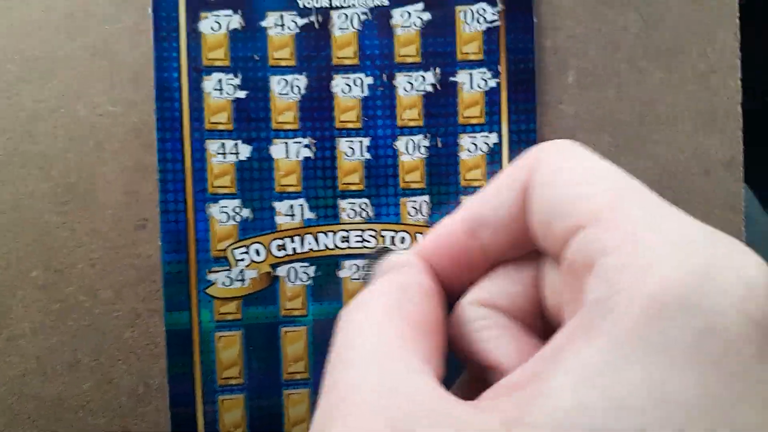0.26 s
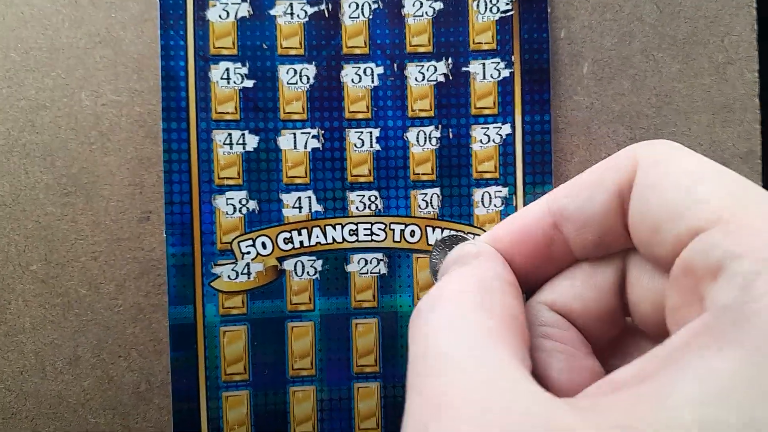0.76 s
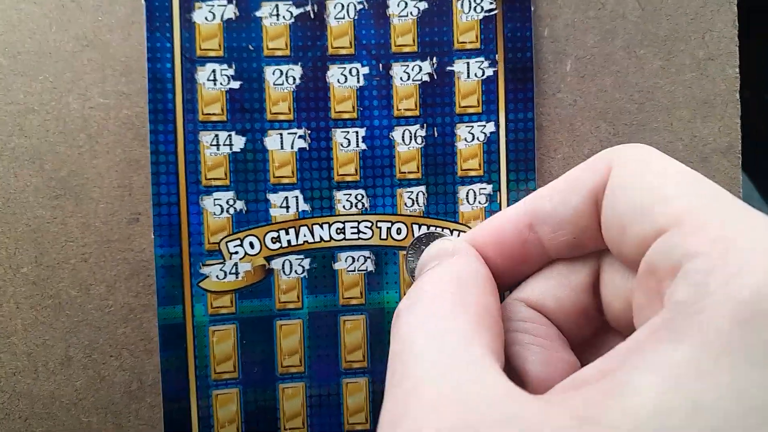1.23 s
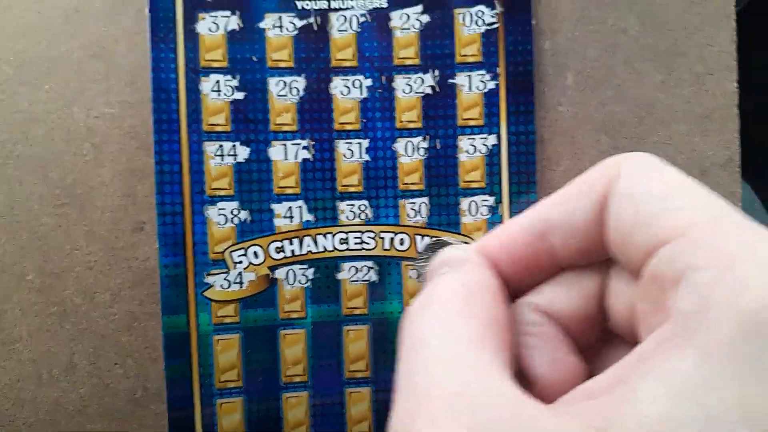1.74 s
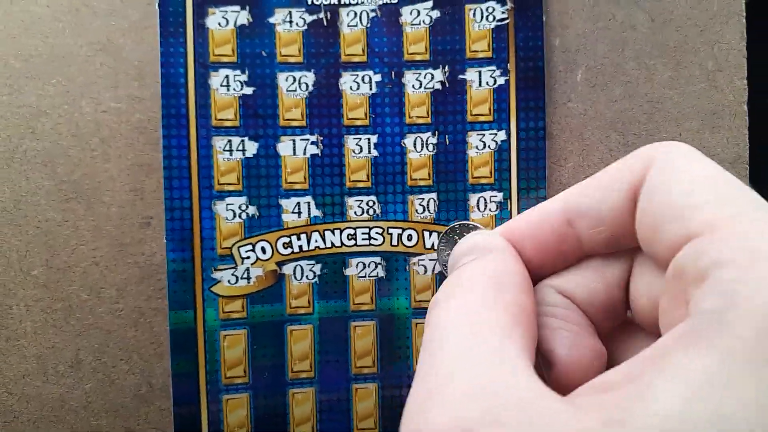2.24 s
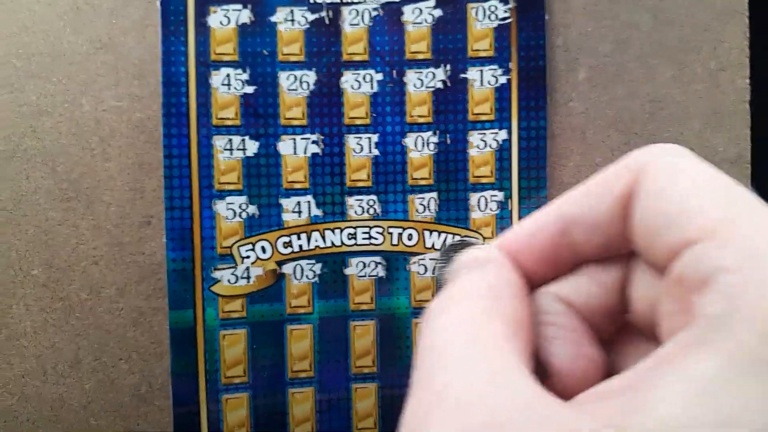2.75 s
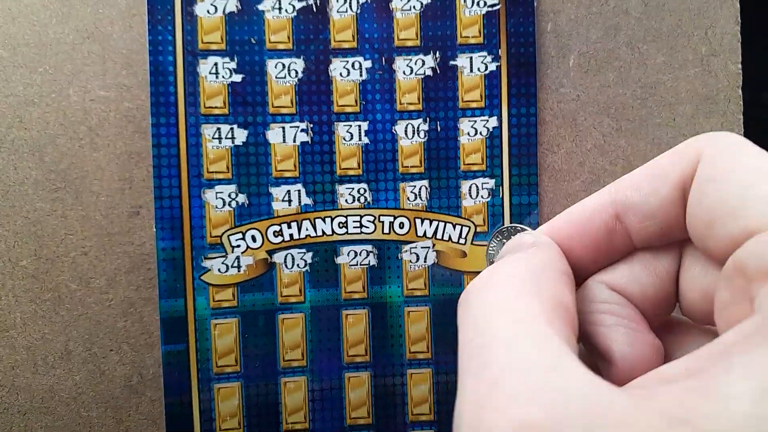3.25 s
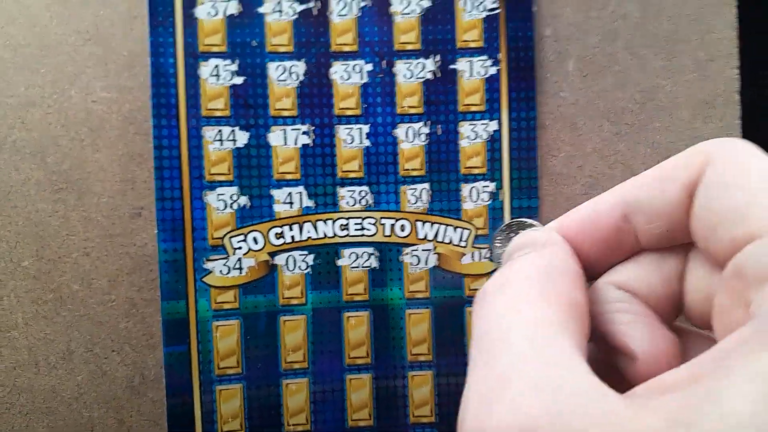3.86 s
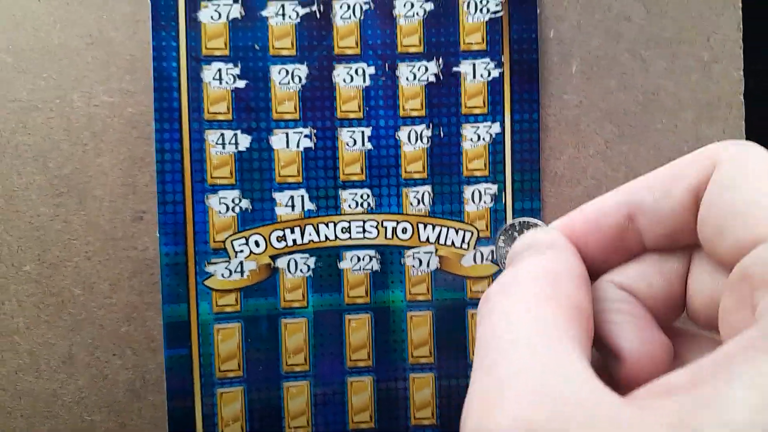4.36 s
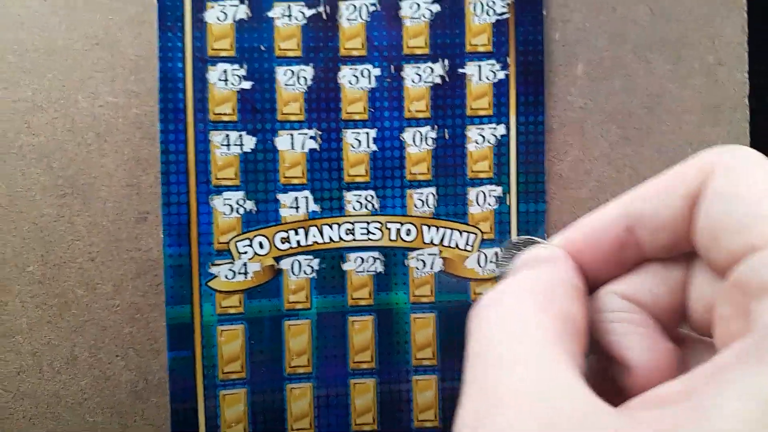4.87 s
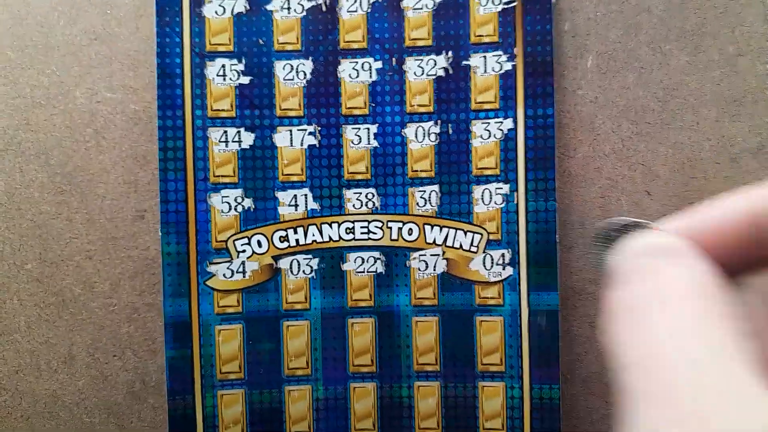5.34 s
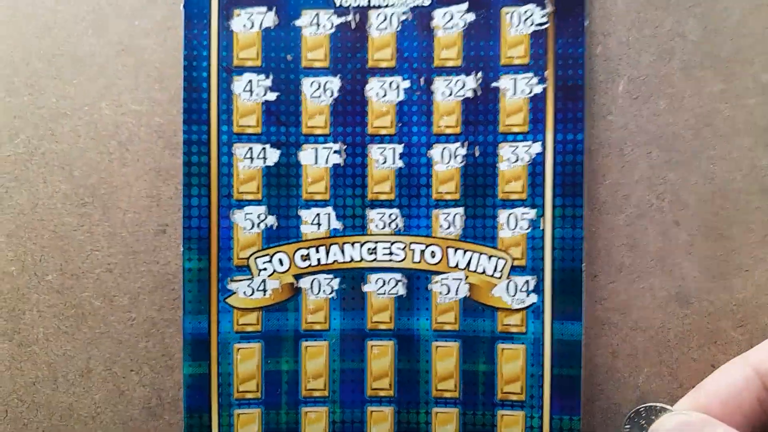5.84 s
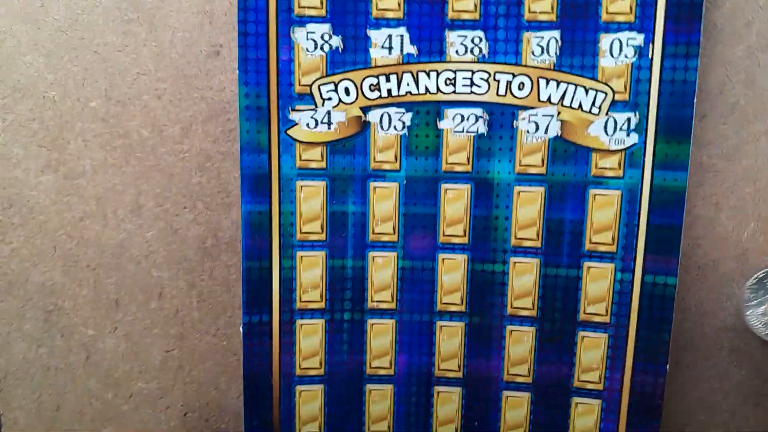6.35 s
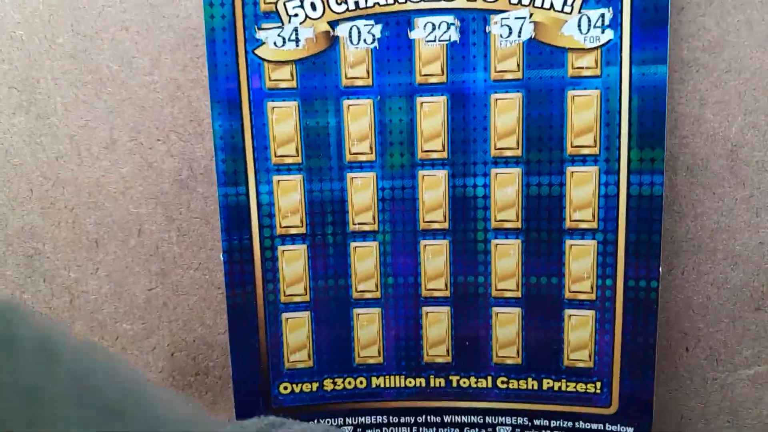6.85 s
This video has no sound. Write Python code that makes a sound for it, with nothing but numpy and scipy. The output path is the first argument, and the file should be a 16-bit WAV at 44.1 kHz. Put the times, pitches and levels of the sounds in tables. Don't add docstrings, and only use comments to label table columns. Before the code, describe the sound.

A coin edge rasps coating off a card in short scratchy bursts inside a parked car while a vehicle approaches, then sliding card and cloth rustle.

```python
import sys
import numpy as np
from scipy import signal
from scipy.fft import rfft, irfft
from scipy.io import wavfile
from scipy.ndimage import uniform_filter1d

SR = 44100
rng = np.random.default_rng(int(sys.argv[2]) if len(sys.argv) > 2 else 0)


def transcribe(u):
    v = np.clip(np.atleast_2d(u).T, -1, 1)
    q = np.round(v * 32767).astype(np.int16)
    wavfile.write(sys.argv[1], SR, q)


def makeup_ratio(level_db):
    decades = np.asarray(level_db, float) / 20
    return 10 ** decades


N = 313110


def rms_one(x):
    return x / np.sqrt(np.mean(x ** 2) + 1e-20)


def in_time(rows):
    s, *columns = np.transpose(rows)
    return [np.interp(np.arange(N) / SR, s, c) for c in columns]


def at_hz(points, hz):
    table_hz, values = np.transpose(points)
    return np.interp(np.log(hz), np.log(table_hz), values)


def fft_hz():
    return np.fft.rfftfreq(N, 1 / SR) + 1


def colour(x, spectrum):
    hz = fft_hz()
    inside = (hz > spectrum[0][0]) & (hz < spectrum[-1][0])
    return rms_one(irfft(rfft(x) * makeup_ratio(at_hz(spectrum, hz)) * inside, N))


def drift(rate_hz):
    r = np.exp(-80 * np.pi * rate_hz / SR)
    noise = rng.standard_normal(N // 40 + 2002)
    slow = signal.lfilter([1], [1, -2 * r, r * r], noise)[2000:]
    return np.interp(np.arange(N) / 40, np.arange(len(slow)), rms_one(slow))


def resonate(x, hz, width_hz):
    r = np.exp(-np.pi * max(width_hz, 2) / SR)
    zeros = np.array([1, 0, -1]) * (1 - r * r) / 2
    return signal.lfilter(zeros, [1, -2 * r * np.cos(2 * np.pi * hz / SR), r * r], x)


def passes(crest_s, sink_s, level_db):
    roundness = 1.7
    t = np.arange(N // 40 + 2) * 40 / SR
    away = np.abs(t[:, None] - crest_s) / np.maximum(sink_s, .012)
    power = makeup_ratio(level_db - 10 * away ** roundness) ** 2
    return np.interp(np.arange(N) / SR, t, np.sqrt(power.sum(axis=1)))


# f/Hz, left-right likeness [0..1]
PORT_LIKENESS = [(60, 0.9), (130, 0.93), (290, 0.77), (640, 0.24), (1410, 0.024), (3100, 0.0063),
                 (6820, 0.0015), (15000, 0.11)]


def diffuse():
    mid, side = rfft(rng.standard_normal((2, N)))
    alike = np.clip(at_hz(PORT_LIKENESS, fft_hz()), -1, 1)
    return irfft(np.sqrt(1 + alike) * mid + np.sqrt(1 - alike) * side * [[1], [-1]], N)


# f/Hz, density/dB per Hz
HISS_SPECTRUM = [(18, -40), (30, -10.5), (47, -3.5), (69, 0), (88, -28.5), (133, -8.5), (213, -22),
                 (270, -42), (333, -25.5), (832, -41), (5910, -53.5), (9470, -46), (15600, -45.5)]


def hiss():
    return makeup_ratio(-63) * colour(diffuse(), HISS_SPECTRUM)


# t/s, f/Hz
EXHAUST_NOTE = [(0, 128.2), (3.7, 125.), (4.2, 134.), (4.45, 135), (4.7, 145.1), (5., 142.), (5.25, 147.),
                (5.5, 156.2), (5.8, 159.8), (6.4, 150.7), (7.1, 125.)]
# t/s, level/dB
FIRING_LEVEL = [(0, -81.5), (1.8, -72), (3, -68), (4.1, -66.5), (4.45, -57.5), (4.7, -53.5), (5.1, -60.5),
                (5.3, -56), (5.6, -49), (5.75, -60), (6.2, -54), (7.1, -68.5)]
# f/Hz, level/dB, centre t/s, spread/s
GEAR_TONES = [
    (212.1, -66, 4.87, 3.3),
    (282.5, -66.5, 5.73, .5),
    (476.6, -61.5, 6.98, 0.35),
    (556, -72.5, 6.8, 0.33),
]


def hums():
    waver_hz, waver_db = 1.21, 2
    t = np.arange(N) / SR
    tones = [(in_time(EXHAUST_NOTE)[0], in_time(FIRING_LEVEL)[0])]
    for hz, level_db, centre_s, spread_s in GEAR_TONES:
        tones.append((hz, level_db - 8.7 * ((t - centre_s) / spread_s) ** 2))
    out = np.zeros(N)
    for hz, level_db in tones:
        phase = 2 * np.pi * np.cumsum(hz + waver_hz * drift(2.56)) / SR
        out += makeup_ratio(level_db + 4 + waver_db * drift(5.4)) * np.sin(phase)
    return out


# t/s, road roar level/dB, exhaust level/dB
VEHICLE = [(0.0, -68.5, -73), (.32, -74.5, -72), (.92, -89, -78.5), (1.4, -85, -64.5), (1.72, -76, -73.5),
           (1.86, -61, -54), (2.15, -75.5, -71), (2.41, -67, -61), (2.77, -66.5, -69), (2.98, -60.5, -63),
           (3.3, -66, -58), (3.62, -64.5, -63.5), (4.2, -58, -55), (4.61, -53.5, -53.5),
           (5.1, -57.5, -49.5), (5.3, -55.5, -48.5), (5.62, -56.5, -47.5), (5.8, -53, -52.5),
           (6.15, -55, -53.5), (6.45, -54.5, -53.5), (7.1, -56.5, -62.5)]
# f/Hz, density/dB per Hz
ROAR_SPECTRUM = [(110, -41), (190, -4), (253, -6.5), (288, -9.5), (329, -13), (383, -12.5), (472, -13.5),
                 (785, -31), (1200, -43.5), (1560, -53), (2640, -120)]
# f/Hz, density/dB per Hz
TYRE_SPECTRUM = [(1000, -20), (1450, -11.5), (1750, -5.5), (2000, -5), (2200, -7.5), (2800, -16.5),
                 (3150, -30), (3850, -18), (4600, -47)]
# f/Hz, width/Hz, level/dB, centre t/s, spread/s
WHINE_BANDS = [(283.5, 11, -59.5, 5.77, 0.66), (470.5, 31, -61, 7.12, 0.71), (3830, 250, -86, 7.05, 0.14),
               (1900, 690, -71.5, 6.39, 0.16), (1970, 440, -77.5, 2.49, 0.19), (570, 103, -62, 6.37, 0.61),
               (2080, 500, -70.5, 3.1, 0.042), (246, 67, -58.5, 5.4, 0.17), (2000, 100, -72.5, 7.06, 0.38),
               (2520, 400, -77.5, 6.85, 0.49), (1260, 230, -74.5, 6.22, 0.27), (713, 170, -70, 6.4, 0.28)]


def traffic():
    t = np.arange(N) / SR
    roar_db, exhaust_db = in_time(VEHICLE)
    swing_db, load_db = roar_db + 60, exhaust_db + 60
    boom = rms_one(resonate(resonate(diffuse(), 52.7, 22), 74.3, 63))
    boom_db = -53.5 + 0.48 * swing_db + 0.46 * load_db + 2.23 * drift(0.63)
    exhaust_hz, = in_time(EXHAUST_NOTE)
    band = signal.hilbert(resonate(resonate(diffuse(), 138.3, 24), 132.6, 67))
    shift = np.exp(2j * np.pi * np.cumsum(exhaust_hz - 140) / SR)
    exhaust = rms_one(np.real(band * shift))
    out = makeup_ratio(boom_db) * boom + makeup_ratio(exhaust_db + 1.24) * exhaust + hums()
    out += makeup_ratio(roar_db + drift(2.9)) * colour(diffuse(), ROAR_SPECTRUM)
    wheels_pass_db = 5.5 * np.exp(-((t - 6.45) / 0.24) ** 2)
    tyre_db = -81.5 + 0.55 * swing_db + wheels_pass_db + drift(1.5)
    out += makeup_ratio(tyre_db) * colour(diffuse(), TYRE_SPECTRUM)
    for hz, width_hz, level_db, centre_s, spread_s in WHINE_BANDS:
        whine = rms_one(resonate(resonate(diffuse(), hz, width_hz), hz, 1.73 * width_hz))
        out += makeup_ratio(level_db - 5.9 * ((t - centre_s) / spread_s) ** 2) * whine
    return out


# crest t/s, time to sink 10 dB/s, level/dB
FINGER_BRUSHES = [(.2, 0.5, -100), (1.3, 5.5, -91), (1.86, 0.4, -82), (2.47, -0.77, -74), (2.98, 0, -86),
                  (3.6, 1.8, -90), (4.5, 1.2, -89.5), (5.3, 0.04, -70), (5.38, 0, -73), (5.46, 0.02, -73),
                  (5.55, 0.06, -75), (6.1, 1.4, -85.5), (6.42, 0.44, -78), (6.59, -0.24, -70),
                  (6.82, -0.5, -67), (7.06, 0.25, -75.5)]
# crest t/s, time to sink 10 dB/s, level/dB, share above 9 kHz re level/dB
SLIDES = [(.57, 0, -77.5, -10), (0.658, 0.04, -66, -4.5), (.737, .025, -77, -26),
          (3.059, 0.0064, -60.5, -11), (3.122, 0.0751, -67.5, -9), (5.211, -0.03, -70, -34),
          (5.26, 0.1, -75, -16), (5.32, 0.1, -67, -6), (5.375, 0.17, -81, -10), (5.416, 0.12, -73, -3),
          (5.47, 0.2, -75, -13), (5.54, 0.07, -68, -9), (5.612, -0.016, -57, -5), (5.63, 0.01, -70, -4),
          (5.692, -0.04, -63, -12), (5.77, 0, -79, -14), (5.83, 0.02, -66.5, -12), (5.74, 0.3, -75, -8),
          (5.95, 0.8, -95.5, 6), (6.19, 0.2, -78, -6), (6.36, 0.2, -80, -12), (6.256, -0.05, -66.5, -8),
          (6.3, .09, -74, -8), (6.44, 0.17, -74.5, -4), (6.58, 0.2, -79, 1.5), (6.816, -0.02, -66, 0.5),
          (6.93, .15, -92, 10), (7.079, 0.01, -67, -5)]
# f/Hz, density/dB per Hz
CLOTH_SPECTRUM = [(530, -41), (900, -5), (1120, 1), (1360, -2.5), (1600, -2), (2550, -1), (3490, -6),
                  (7410, 3.5), (8800, -7.5), (11400, -19), (19400, -120)]


def rustle():
    grains = diffuse() * makeup_ratio(1.1 * drift(59))
    skin = colour(diffuse(), [(3000, -8.5), (4500, -12.0), (5600, -12.0), (6600, -1.5),
                              (7400, 0.0), (8200, -6.0), (8700, -20.0)])
    finger_drag = makeup_ratio(-25.5) * pressure(column=0, narrow=1.0)
    out = (passes(*np.transpose(FINGER_BRUSHES)) + finger_drag) * skin
    fibres = colour(grains, CLOTH_SPECTRUM)
    airy = colour(grains, [(8600, -17.0), (11000, 6.0), (13500, 7.0), (15750, 9.0)])
    crest_s, sink_s, level_db, airy_db = np.transpose(SLIDES)
    out = out + passes(crest_s, sink_s, level_db) * fibres
    return out + passes(crest_s, sink_s, level_db + airy_db) * airy


# t/s, peak level/dB, f/Hz
CARD_TICKS = [(.211, -27, 840), (.216, -49, 4500), (.258, -46, 6300), (.484, -64, 1610), (.556, -59, 1390),
              (2.267, -34.5, 3280), (2.437, -41.5, 7350), (2.466, -60.5, 5030), (3.055, -48, 6900),
              (3.232, -53.5, 1110), (3.759, -51, 8000), (3.7592, -51, 12500), (4.002, -52, 6040),
              (4.405, -54, 2490), (5.083, -47, 10500), (5.083, -47, 7600), (5.308, -42.5, 1406),
              (5.407, -40.5, 5430), (5.407, -37.5, 7800), (5.407, -46.5, 12900), (5.728, -48, 1350),
              (5.82, -48.5, 1470), (5.607, -33, 6100), (6.702, -45, 2300), (6.293, -41, 690),
              (6.294, -46, 1500), (6.625, -58, 2000), (6.89, -50, 2000), (7.097, -51, 1500),
              (7.097, -50, 4010),
              (4.0445, -46., 8000),
    (4.0446, -47., 12500),
    (6.2515, -34., 6600),
    (6.2518, -42., 2400),
    (6.2518, -44., 1400),
    (6.2516, -43., 10500),
    (6.2514, -42., 3800),
]
# t/s, peak level/dB, f/Hz
KNUCKLE = [
    (6.291, -31, 183),
]


def taps():
    out, t = np.zeros(N + SR), np.arange(round(.1 * SR)) / SR
    for s, peak_db, hz in CARD_TICKS:
        tick = resonate(resonate(t == 0, hz, 0.23 * hz), hz, 0.46 * hz)
        out[round(s * SR):][:len(t)] += makeup_ratio(peak_db - 10.0) * tick / np.abs(tick).max()
    for s, peak_db, hz in KNUCKLE:
        thud = np.sin(2 * np.pi * hz * t) * np.exp(-t / 0.0185) * (1 - np.exp(-t / 0.0026))
        thud += 0.31 * np.sin(2 * np.pi * 520 * t) * np.exp(-t / 0.0016)
        out[round(s * SR):][:len(t)] -= makeup_ratio(peak_db + 0.5) * thud
    return out[:N]


# t/s, peak level/dB
RIDGE_SNAGS = [(0.041, -52), (0.071, -49), (0.185, -38), (0.214, -34), (0.43, -44), (0.651, -54),
               (0.947, -55), (1.115, -51), (1.158, -53), (1.323, -50), (1.495, -52), (1.645, -57),
               (1.659, -65), (1.825, -58), (1.889, -53), (2.248, -48), (2.269, -38), (2.391, -54),
               (2.653, -54), (2.898, -59), (2.908, -54), (2.987, -55), (3.36, -57), (3.382, -45),
               (3.526, -45), (3.639, -55), (3.778, -44), (3.962, -54), (4.055, -33), (4.405, -52),
               (4.467, -48), (4.525, -38), (4.6, -36), (4.763, -47), (4.891, -56), (4.899, -41),
               (5.005, -45), (5.015, -43), (5.218, -54)]


def snags():
    shudder_s, force_db = 0.0035, -13
    force, t = np.zeros(N), np.arange(round(.03 * SR)) / SR
    for s, peak_db in RIDGE_SNAGS:
        force[round(s * SR):][:len(t)] += makeup_ratio(peak_db + force_db) * np.exp(-t / shudder_s)
    return force * rng.choice([-1, 1], N)


def grit(per_s, uneven_db):
    steady = .7
    sizes = makeup_ratio(uneven_db * np.minimum(rng.exponential(1, N), 5)) * rng.choice([-1, 1], N)
    grains = rms_one(sizes * (rng.random(N) < per_s / SR))
    flow = np.abs(uniform_filter1d(grains ** 2, size=1100)) + .05
    return rms_one(grains / flow ** (steady / 2))


# start t/s, swell/s, rasp level/dB, board push re rasp/dB, sizzle re rasp/dB
SWELL_STROKES = [(.066, 0.018, -52, 3, -8.5), (0.199, 0.011, -39.5, 1.5, -5),
                 (.312, 0.036, -58.5, 8.5, -11), (1.141, 0.027, -55, 7, -8), (1.333, 0.043, -54, 0, -2.5),
                 (1.488, 0.04, -59, 11.5, -13), (2.256, 0.0059, -51, 1, -0.5), (2.373, 0.018, -52, 6, -9),
                 (2.767, 0.041, -55.5, 2.5, -1), (2.905, 0.03, -51, 4, -4), (3.519, 0.037, -52, -1, -3.5),
                 (3.678, 0.022, -48.5, 5, -8), (3.814, 0.024, -54, -12, 2.5),
                 (3.976, 0.028, -52.5, 4.5, -16), (4.515, 0.016, -49, -8.5, -17),
                 (4.591, 0.053, -50.5, -5, -9), (4.762, 0.024, -50.5, 5.5, -13),
                 (4.9, 0.04, -48.5, 0.7, -6.5), (5.206, 0.011, -47.5, 6, -20), (6.2, 0.087, -66, 3, -4)]
# start t/s, fade/s, rasp level/dB, board push re rasp/dB, sizzle re rasp/dB
DIG_STROKES = [(.555, 0.048, -80.5, 4, -8), (.642, 0.023, -62, -0.5, -26), (1.106, 0.011, -60, 3, -17),
               (1.879, 0.056, -54, -3, -8.5), (2.45, 0.05, -64, 8.5, -3), (2.982, 0.013, -58.5, 6.5, -10),
               (3.63, 0.036, -60, 8, -21), (4.398, 0.0037, -59, 11.5, -12), (4.458, 0.053, -60, 3.5, -36),
               (5, 0.029, -52.5, 6, -21), (5.612, 0.029, -61.5, 7.5, -3), (6.285, 0.033, -62.5, 13.5, -16)]
# start t/s, rise/s, rasp level/dB, board push re rasp/dB, sizzle re rasp/dB
SWEEP_STROKES = [(.04, 0.023, -59, 7, -6.5), (0.159, 0.029, -59.5, 3.5, -4), (.43, 0.028, -63, 0, -9),
                 (.942, 0.021, -57.5, -2.5, -20), (1.647, 0.026, -54, 1, -2),
                 (1.77, 0.018, -67.5, 15.5, -25), (1.805, 0.03, -58.5, 7.5, -15),
                 (1.934, 0.024, -55, -2, -4.5), (2.083, 0.014, -65.5, 12.5, -22),
                 (2.226, 0.018, -58.5, -2.5, -9), (2.327, 0.033, -67.5, 16, -26),
                 (2.634, 0.018, -57.5, -4, -12), (3.375, 0.025, -48.5, 6.5, -11.5),
                 (3.777, 0.038, -54.5, 0.5, -6), (3.943, 0.022, -61.5, 8, -23.5),
                 (4.049, 0.031, -52, 0, -4.5), (4.09, 0.028, -53.5, 5.5, 1), (4.17, 0.05, -64, -3, -19),
                 (4.345, 0.036, -65, 9.5, -27), (5.032, 0.022, -54, 4, -16.5),
                 (5.67, 0.034, -69.5, 3.5, -5.5)]


def pressure(column, narrow):
    stop_s, dig_s = 0.0081, 0.012
    rise_curve, fall_curve = 2.7, 2.07
    power, t = np.zeros(N), np.arange(N) / SR
    strokes = [(row, row[1], stop_s) for row in SWELL_STROKES]
    strokes += [(row, dig_s, row[1]) for row in DIG_STROKES]
    strokes += [(row, row[1], row[1]) for row in SWEEP_STROKES]
    for row, rise_s, fall_s in strokes:
        crest_s = row[0] + rise_s
        near = slice(max(round((crest_s - .2) * SR), 0), round((crest_s + .2) * SR))
        late_s = t[near] - crest_s
        away = np.where(late_s < 0, -late_s / max(rise_s, .004), late_s / max(fall_s, .004))
        curve = np.where(late_s < 0, rise_curve, fall_curve)
        peak_db = row[2] + (row[column] if column else 0)
        power[near] += makeup_ratio(peak_db - 6.86 * narrow * away ** curve) ** 2
    return np.sqrt(power)


def board(force, modes, trim_db, tilt_db, pivot_hz=1600):
    field_change_s = [.8, 3.25]
    field = np.searchsorted(field_change_s, np.arange(N) / SR)
    out, unit = 0, 0
    for k, (hz, width_hz, *levels_db) in enumerate(modes):
        share_db = np.take(levels_db, field) + tilt_db * np.log2(hz / pivot_hz) + 1.3 * drift(7.5)
        out = out + (-1) ** k * resonate(makeup_ratio(share_db) * force, hz, width_hz)
        unit += makeup_ratio(np.mean(levels_db)) ** 2 * np.pi * width_hz / SR
    return makeup_ratio(trim_db) * out / np.sqrt(unit)


# f/Hz, width/Hz, level/dB on fields 1, 2, 3
LOW_MODES = [(68, 24.4, -6, -3.5, -2.5), (125, 52, -8.5, -4, -6), (218, 60, -6, -4, -6),
             (362, 45, 1.5, 1, 0.5), (453, 44, -5.5, -3.5, -5), (501.6, 46.6, -6.5, -9.5, -7.5),
             (622, 118, -12, -15.5, -14), (783, 280, -21.5, -22, -21)]
# f/Hz, width/Hz, level/dB on fields 1, 2, 3
HIGH_MODES = [(630, 150, -15, -13.5, -17), (831, 120, 0, -7, -9.5), (930, 130, -5, -12.5, -11),
              (1103, 43, 1, -1.5, -1), (1183, 97, -4, -0.5, -1.5), (1346, 86, 1, 3, 4.5),
              (1632, 74, 5, 5.5, 3.5), (1874, 122, 1.5, 0.5, 5.5), (2090, 156, 0, -1, 2.5),
              (2380, 72, 7.5, 7, 4.5), (2712, 85, -4.5, -3, -0.5), (2900, 50, -11.5, -15, -7.5),
              (3070, 66, -15.5, -8, -14.5)]
# f/Hz, width/Hz, level/dB on fields 1, 2, 3
RIM_MODES = [(3025, 270, -1.5, 1.5, 5), (3950, 150, -0.5, 2.5, 1), (4130, 170, 2.5, 2, -2.5),
             (4945, 570, 2, -3.5, -2.5), (5830, 320, -6, 0.5, -1), (6810, 390, 2.5, 1.5, 3),
             (7600, 630, 0.5, -4.5, -4), (8600, 1500, -26, -21, -16), (10700, 260, -13, -10, -12.5),
             (12640, 2500, -9, -9, -12.5)]
# t/s, rasp tilt/dB per octave, sizzle tilt/dB per octave
CONTACT_SPOT = [(0, -1.5, -0.5), (.6, -4.5, -1.5), (1.2, -3.5, -3.5), (2.3, -2, -7), (2.9, -5.5, -1.5),
                (3.4, -2.5, 0), (4.1, -7, -3), (4.7, -6, -3), (5.3, -5.5, -3.5), (7.1, 6, 11)]


def coin():
    rasp_tilt_db, sizzle_tilt_db = in_time(CONTACT_SPOT)
    catch = makeup_ratio(2.58 * drift(97))
    rasp_force = grit(3000, 5.07) * catch * pressure(column=0, narrow=0.98) + snags()
    rasp = board(rasp_force, HIGH_MODES, -2.88, rasp_tilt_db)
    lean_on = uniform_filter1d(pressure(column=3, narrow=0.81), size=700)
    push = board(grit(3000, 1.87) * lean_on, LOW_MODES, 1.0, 0)
    own_per_port = np.array([grit(7000, 3.6) for port in "LR"])
    tearing = grit(7000, 4.8) + .8 * own_per_port
    sizzle_force = tearing * catch * pressure(column=4, narrow=1.82) + makeup_ratio(-16.0) * snags()
    sizzle = board(sizzle_force, RIM_MODES, -3.5, sizzle_tilt_db, pivot_hz=5400)
    return rasp + push + sizzle


def cabin(x):
    t60_s, level_db = 0.07, -8.5
    t = np.arange(round(.3 * SR)) / SR
    tail = rng.standard_normal((2, len(t))) * makeup_ratio(-60 * t / t60_s) * (t > .002)
    tail = signal.sosfilt(signal.butter(1, [600., 5000.], "band", fs=SR, output="sos"), tail)
    tail = tail / np.sqrt(np.sum(tail ** 2, axis=1, keepdims=True))
    return makeup_ratio(level_db) * signal.fftconvolve(x, tail, axes=1)[:, :N]


# f/Hz, phase/rad
LEFT_LAG = [(60, 0.0066), (480, 0.092), (1000, 0.7), (1600, 2.56), (2600, 4.42), (3600, 3), (5000, 4.15),
            (8000, 9.85), (16000, 20.5)]
# f/Hz, level/dB
PORT_LEAN = [(60, 0), (130, 0.5), (200, 2), (380, -2.5), (700, 0.8), (1200, 1), (1550, 7.5), (2400, -1.5),
             (3000, -2.5), (4400, -8.5), (5500, -3), (6600, 2), (8300, -13), (9800, 1.5), (15000, -3.5)]


def scene():
    hz, sides = fft_hz(), np.array([[.5], [-.5]])
    near = coin() + taps()
    direct = irfft(rfft(near) * np.exp(-1j * at_hz(LEFT_LAG, hz) * sides), N)
    air = traffic() + rustle() + cabin(near) + direct
    return irfft(rfft(air) * makeup_ratio(at_hz(PORT_LEAN, hz) * sides), N) + hiss()


def top_cut(x):
    return signal.sosfilt(signal.butter(12, 15770, fs=SR, output="sos"), x)


def record(dry):
    mix = signal.sosfilt(signal.butter(2, 38., "high", fs=SR, output="sos"), dry)
    return top_cut(mix)


dry = scene()
out = record(dry)
transcribe(out)
```